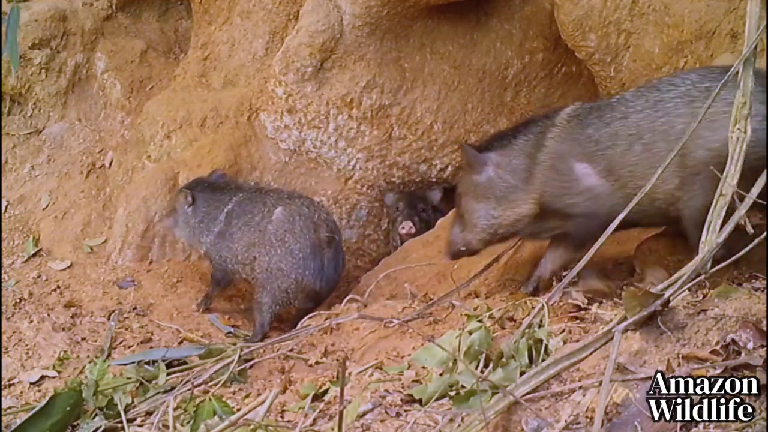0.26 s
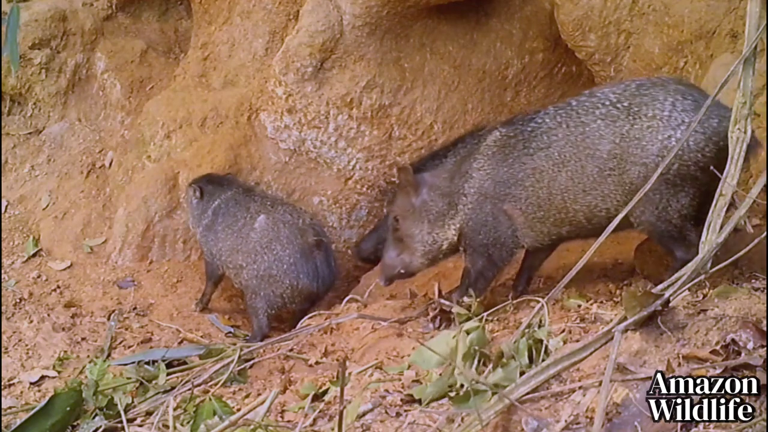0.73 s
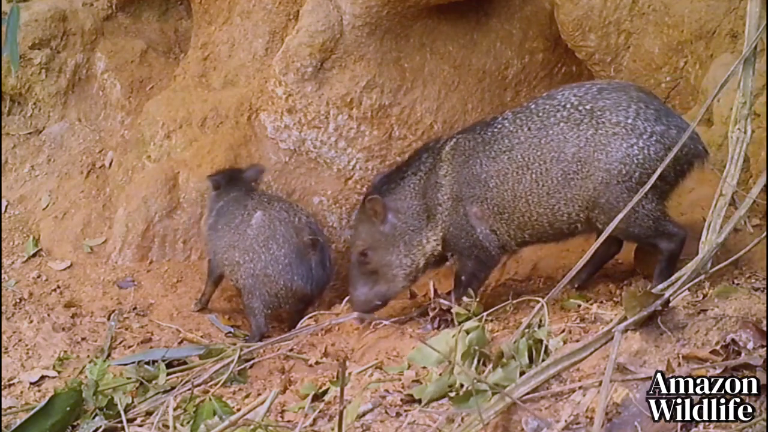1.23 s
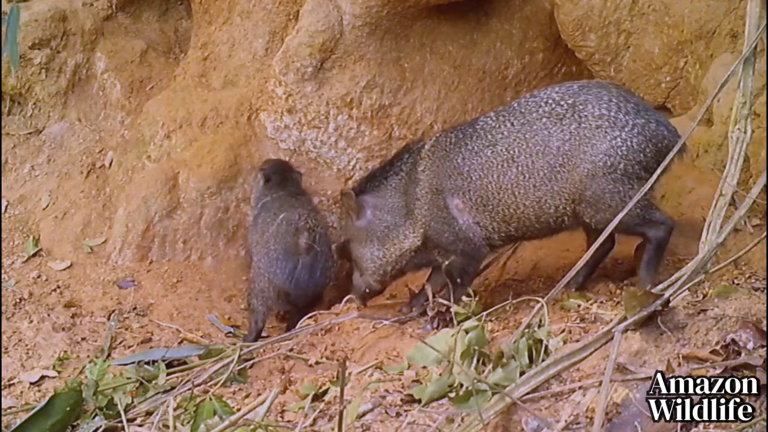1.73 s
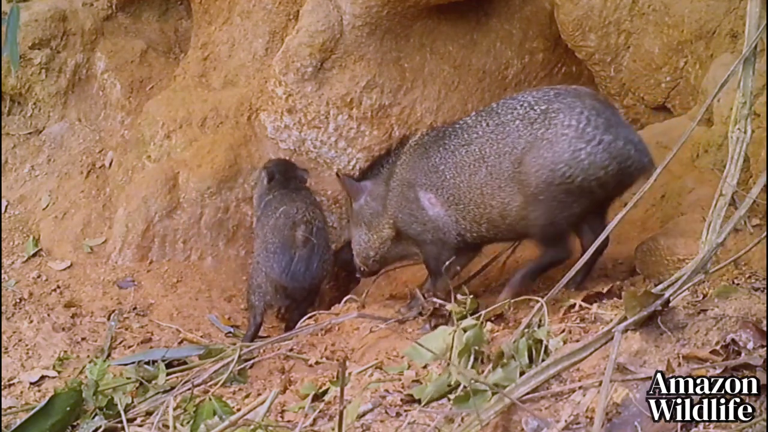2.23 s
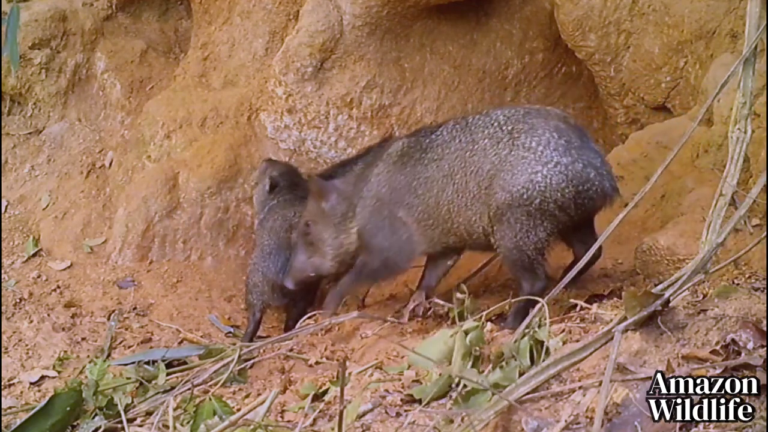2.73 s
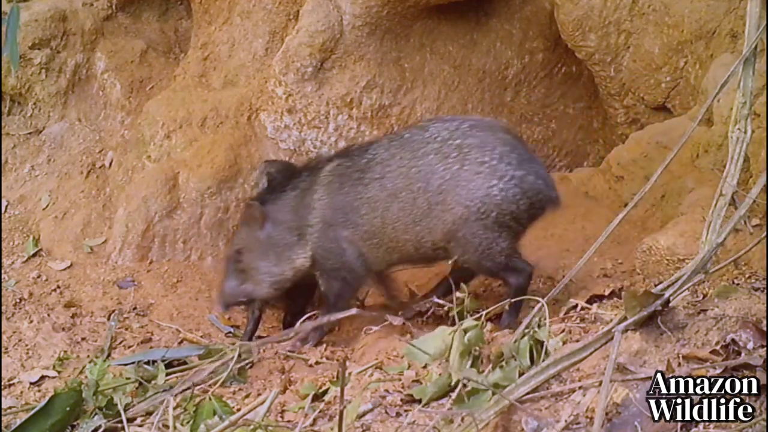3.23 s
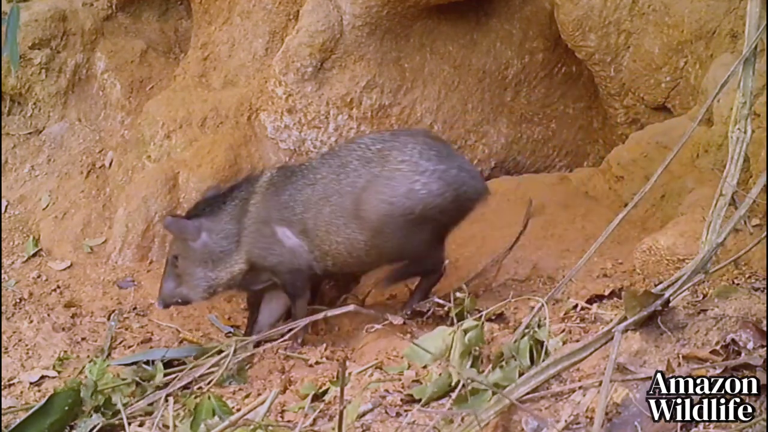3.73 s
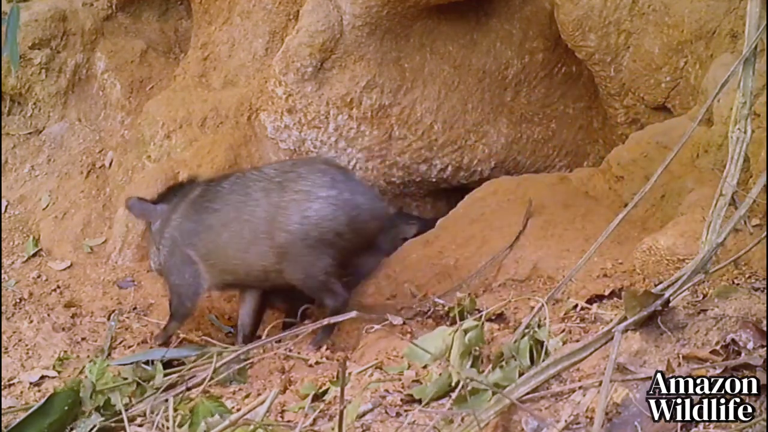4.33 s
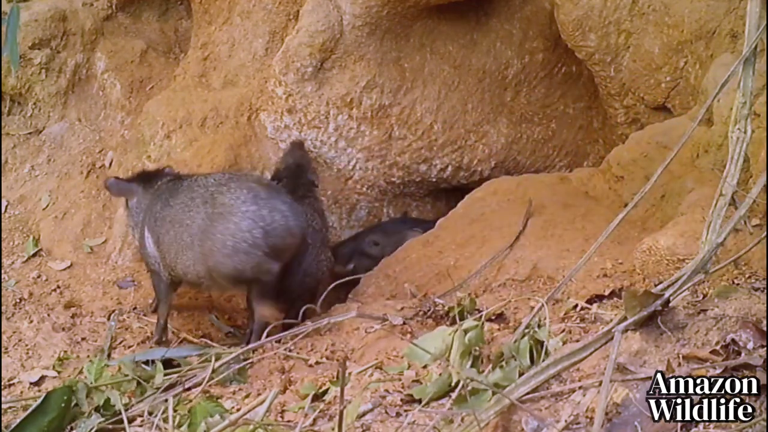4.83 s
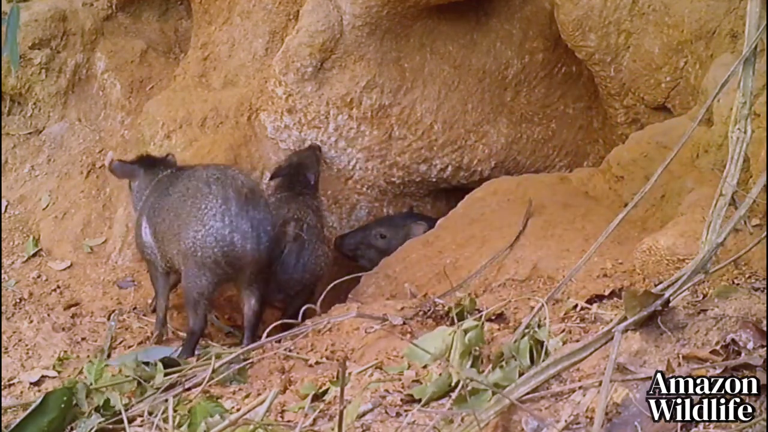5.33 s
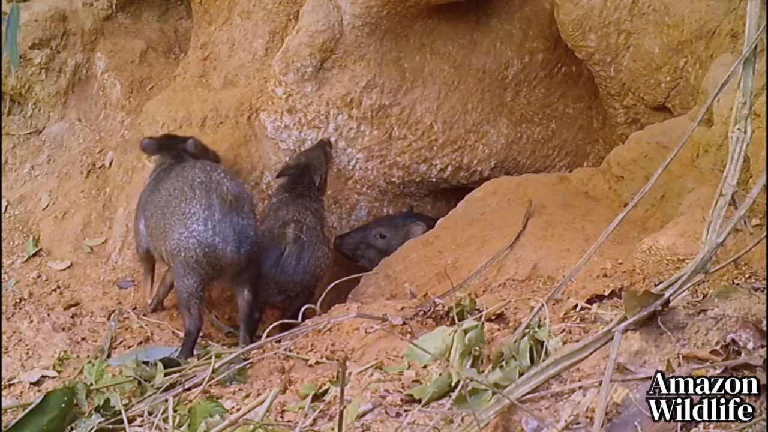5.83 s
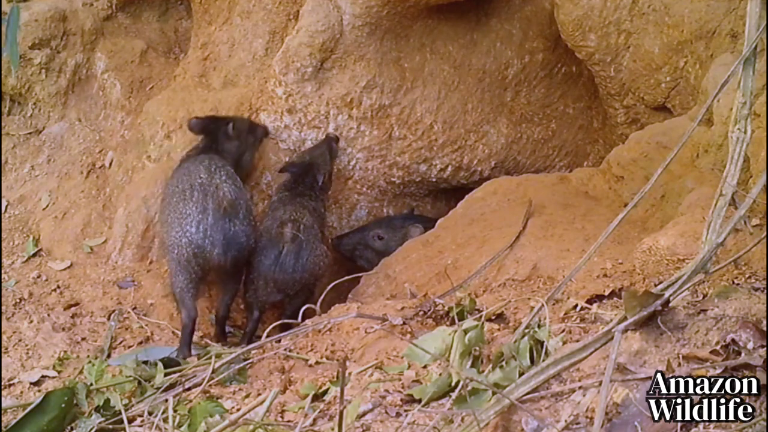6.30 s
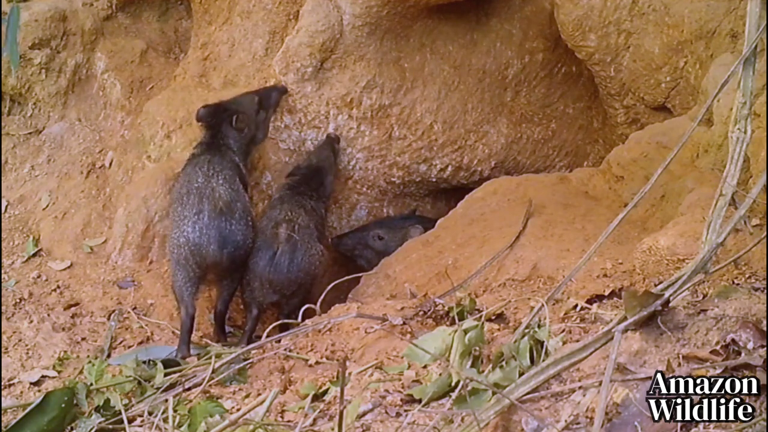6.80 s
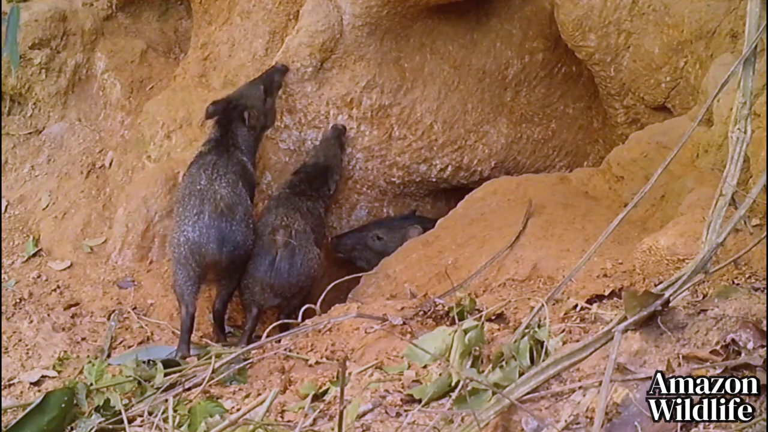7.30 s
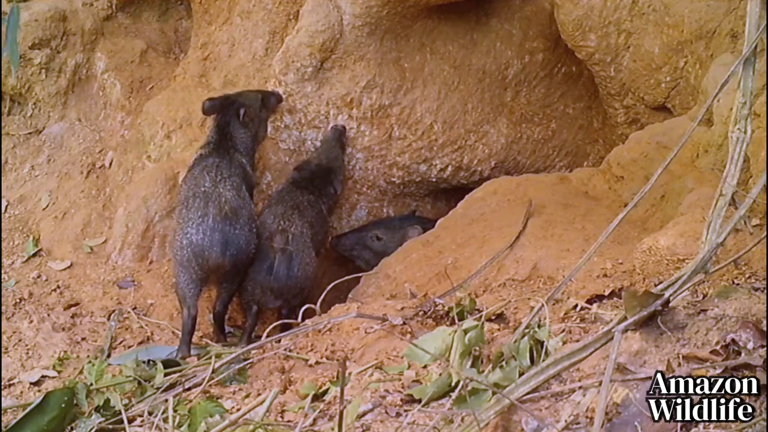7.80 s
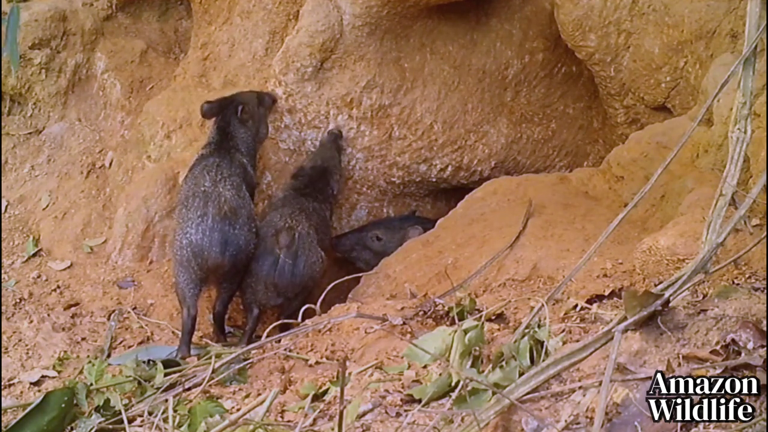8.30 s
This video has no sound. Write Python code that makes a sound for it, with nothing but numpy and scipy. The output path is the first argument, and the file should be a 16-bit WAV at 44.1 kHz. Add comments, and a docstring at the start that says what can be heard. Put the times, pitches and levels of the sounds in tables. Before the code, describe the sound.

Throughout, crickets repeat high chirps about four or five times a second, with higher katydid rasps, a distant insect chorus and a soft wash of tropical forest air. Nearby, wild pigs scuff through dry leaves and loose soil. A quick cluster of sharp twig snaps and a gritty scrape comes at 0.3 to 0.6 seconds. Lighter clicks follow, then another loud crackle and scuffing from 2.4 to 2.8. More shuffles and snaps come around 3.4, 4, 4.6 to 5.4, 6.6 to 6.9, 7.6 and 8.1, with a sharp crack at 8.5. Soft low footfalls thud near 0.6 and 2 seconds. Faint, thin whistles sound far off around 1.6, 3 and 8, and a faint hoarse drone sinks in pitch between 2.5 and 4.3. Two tiny, low grunts come at 6.1 and 7.1. Everything is fairly quiet, heard through a small microphone with softened top treble.

```python
"""Wild pigs in a tropical forest at night.

Crickets and katydids stridulate, their calls scattered by the trunks, over a far insect chorus and a
steady wash of air. Pigs scuff through loose soil and leaf litter at a clay bank, snap twigs, shake the
ground with heavy steps and grunt twice. Thin whistles and a hoarse drone come from far away.
A small trail camera hears it all through a narrow microphone band."""
import sys
import numpy as np
from scipy import signal
from scipy.fft import rfft, irfft, next_fast_len
from scipy.io import wavfile
from scipy.ndimage import uniform_filter1d, map_coordinates

SR = 44100
rng = np.random.default_rng(int(sys.argv[2]) if len(sys.argv) > 2 else 0)


def transcribe(u):
    """Save the signal u as a 16-bit wav file named by the first command-line argument.

    u: samples, shape (n,) or (channels, n), limited to [-1, 1]; the rate is SR.
    q: integer samples, one column per channel.
    """
    v = np.clip(np.atleast_2d(u).T, -1, 1)
    q = np.round(v * 32767).astype(np.int16)
    wavfile.write(sys.argv[1], SR, q)


N = 377055


def amp(db):
    """Amplitude ratio of a level in dB."""
    return 10 ** (np.asarray(db) / 20)


def unit(x):
    """Normalisation to rms 1."""
    return x / np.sqrt(np.mean(x ** 2) + 1e-20)


def along(points, hz):
    """Interpolation of (f/Hz, value) points on a logarithmic frequency axis."""
    f, v = np.transpose(points)
    return np.interp(np.log(hz + 1), np.log(f + 1), v)


def curves(rows):
    """Linear interpolation in time: one value per sample for each column after the first."""
    s, *cols = np.transpose(rows)
    return [np.interp(np.arange(N) / SR, s, c) for c in cols]


def wobble(rate):
    """Smooth random modulation: a spline through rate knots a second."""
    knots = rng.standard_normal(int(N * rate / SR) + 4)
    return map_coordinates(knots, [np.arange(N) * rate / SR])


def filtered(x, response):
    """Linear filtering: the spectrum of x times a frequency response."""
    m = next_fast_len(len(x) + 8192)
    return irfft(rfft(x, m) * response(np.fft.rfftfreq(m, 1 / SR)), m)[:len(x)]


def mode(f, centre_hz, width_hz):
    """Frequency response of a damped resonator."""
    return 1j * f * width_hz / (centre_hz ** 2 - f * f + 1j * f * width_hz)


def band(x, hz, width_hz):
    """Band-pass filtering by three equal resonators in cascade, at rms 1."""
    return unit(filtered(x, lambda f: mode(f, hz, width_hz) ** 3))


def add(track, s, sound):
    """Superposition of a sound on the track at s seconds."""
    part = track[round(s * SR):][:len(sound)]
    part += sound[:len(part)]


def among_trees(call, t60, wet_db):
    """Multiple scattering: trunks give each call its own decaying tail; its energy is kept."""
    t = np.arange(SR // 2) / SR
    path = rng.standard_normal(len(t)) * amp(-60 * t / t60)
    path = amp(wet_db) * path / np.linalg.norm(path)
    path[0] = 1  # direct sound
    heard = signal.fftconvolve(call, path)
    return heard * np.linalg.norm(call) / np.linalg.norm(heard)


def glide(start_hz, end_hz, length, rasp_hz, attack_s):
    """Frequency modulation: a gliding tone of rms 1, broadened by a random deviation of rasp_hz rms."""
    t = np.arange(round(length * SR)) / SR
    uneven = uniform_filter1d(rng.standard_normal(SR // 2), size=60)[:len(t)]
    hz = start_hz + (end_hz - start_hz) * t / length + rasp_hz * unit(uneven)
    envelope = np.minimum(1, np.minimum(t / attack_s, (length - t) / (2.6 * attack_s)))
    return unit(envelope * np.sin(2 * np.pi * np.cumsum(hz) / SR))


def stridulation(strokes, length, low_hz, high_hz, rasp_hz, t60, wet_db, gain_db):
    """File and scraper: the pitch climbs as the wing closes, and uneven teeth spread it."""
    out = np.zeros(N)
    for s, db in strokes:
        tune, stretch = 1 + np.array([0.005, .1]) * rng.standard_normal(2)
        call = glide(low_hz * tune, high_hz * tune, length * stretch, rasp_hz, attack_s=0.014)
        add(out, s, amp(db + gain_db) * among_trees(call, t60, wet_db))
    return out


def air():
    """Broadband ambient noise: a steady wash whose rumble is amplitude-modulated into soft lumps."""
    # spectrum of the wash: f/Hz, power density level/dB re 1 per Hz
    spectrum = [(12, -110), (22, -88), (35, -92), (70, -92.5), (130, -96.5), (250, -98), (500, -97.5),
                (900, -102), (2000, -103), (4600, -106), (9000, -108)]
    white = np.sqrt(SR / 2) * rng.standard_normal(N)  # unit power per Hz
    wash = filtered(white, lambda f: amp(along(spectrum, f)))
    rumble = filtered(wash, lambda f: 1 / (1 + (f / 350) ** 2))
    lumps = amp(0.5 * wobble(8.6) + 1.2 * wobble(21) - 2.0)
    return wash + (lumps - 1) * rumble


def chorus():
    """Incoherent summation: insects too far to tell apart blur into narrow, throbbing noise bands."""
    # far crickets, katydids, low trillers: f/Hz, resonator width/Hz, base level/dB
    far_bands = [(3965, 530, -60), (5450, 1200, -63.5), (2816, 450, -66)]
    # swell and fade of the low trillers: t/s, gain/dB
    swell = [(0, -1), (1.4, 2.5), (2.2, -4), (3.6, 4), (4.9, 1.5), (5.8, 1.5), (6.2, -6), (7.0, -7),
             (7.5, 0.5), (8.55, -6)]
    far_crickets, far_katydids, trillers = [
        amp(db + 1.7 * wobble(5.4)) * band(rng.standard_normal(N), hz, width_hz)
        for hz, width_hz, db in far_bands]
    return far_crickets + far_katydids + amp(curves(swell)[0]) * trillers


def scuffs():
    """Granular noise: a faint rustle is many small impacts, a hard scuff a few large ones."""
    # bands of the litter (leaves, crumbs, thud, hiss): f/Hz, resonator width/Hz, gain/dB
    litter = [(3030, 2540, 0.5), (1823, 660, -1), (943, 1200, -2.5), (6460, 9500, 5.5)]
    # unceasing rustle in the same four bands: relative level/dB
    rustle_db = [-60.5, -65, -67, -68]
    # drags of hooves and snouts: peak t/s, relative leaf level/dB, rise/s, fall/s, crumb offset/dB
    drags = [(0.02, -61.5, .05, 0.12, -15), (0.28, -61, 0.029, 0.065, -18), (0.47, -42.5, 0.11, 0.12, -10),
             (0.535, -43, .07, 0.056, -6), (0.93, -55.5, .04, 0.036, -0.5), (1.07, -57, 0.074, 0.22, -8),
             (1.45, -54.5, 0.024, 0.046, -13), (1.64, -56, 0.12, 0.33, -10), (1.92, -62.5, 0.07, 0.027, 0),
             (2.43, -51, 0.072, .07, -4.5), (2.64, -49, 0.15, .08, -9), (2.76, -54, 0.095, 0.23, -6.5),
             (3.39, -50.5, .03, 0.13, -6), (3.46, -49, 0.092, 0.098, -7), (4.05, -49, 0.17, 0.12, -8),
             (4.6, -51, 0.027, 0.13, -6), (4.69, -50.5, .04, 0.079, -7), (4.83, -50, 0.041, 0.051, 0.5),
             (5.27, -56, 0.036, 0.045, -2), (5.334, -47.5, 0.033, 0.049, -3), (5.5, -58, 0.065, 0.018, -4),
             (6.62, -53.5, 0.089, 0.049, -6), (6.79, -51, 0.12, 0.064, -8), (7.36, -59.5, 0.14, .08, -8),
             (7.6, -49.5, .02, 0.1, -6.5), (7.86, -60, 0.034, 0.041, -7), (8.0, -55, 0.033, .04, -6),
             (8.071, -53, 0.01, .06, -1), (8.4, -59, 0.086, .1, -4), (8.55, -52, .03, .03, -12)]
    edge_db, rounding = 11.5, 1.3  # drop over one rise or fall time; exponent that rounds the top
    thud_db = -14
    t = np.arange(N) / SR
    power = amp(rustle_db)[:, None] ** 2 * np.ones(N)
    for s, db, rise, fall, crumbs_db in drags:
        from_peak = np.maximum((s - t) / rise, (t - s) / fall)
        drag = amp(db - edge_db * from_peak ** rounding)
        hiss_db = -15 + 0.7 * (db + 48.5)  # louder scuffs are brighter
        power += (amp([[0], [crumbs_db], [thud_db], [hiss_db]]) * drag) ** 2
    leaves_db = 10 * np.log10(power[0])
    coarseness = np.clip((leaves_db + 66) / 14, .15, 1)
    clumps = unit(amp(2.2 * wobble(300) + 1.4 * wobble(40)))
    noise = rng.standard_normal(N)
    grains = 3 * [noise * clumps ** coarseness] + [noise * clumps ** 0.69]  # the hiss is always gritty
    bands = [amp(db) * band(x, hz, width_hz) for x, (hz, width_hz, db) in zip(grains, litter)]
    return np.sum(np.sqrt(power) * bands, axis=0)


def katydids():
    """Stridulation with a very uneven tooth rate gives rising rasps."""
    # wing strokes: t/s, relative level/dB
    strokes = [(0.044, -62), (0.575, -63), (0.855, -79), (1.017, -66.5), (1.249, -61), (1.57, -65.5),
               (1.838, -69.5), (2.12, -68.5), (2.364, -60), (2.601, -62.5), (2.751, -60.5), (3.117, -60),
               (3.307, -64), (3.472, -60.5), (3.736, -59), (4.033, -59.5), (4.345, -61), (4.756, -61.5),
               (5.138, -59), (5.4, -67), (5.574, -59.5), (5.68, -65), (5.844, -68), (6.058, -63.5),
               (6.37, -67), (6.704, -62.5), (7.118, -64.5), (7.298, -63.5), (7.532, -63.5), (7.727, -63),
               (7.974, -61.5), (8.301, -62), (8.483, -61)]
    return stridulation(strokes, length=0.11, low_hz=5180, high_hz=5900, rasp_hz=226.5,
                        t60=0.77, wet_db=2.5, gain_db=5.0)


def crickets():
    """Stridulation with a nearly even tooth rate gives rising, tonal chirps."""
    # wing strokes: t/s, relative level/dB
    strokes = [(0.095, -53), (0.212, -51), (0.397, -49.5), (0.52, -51.5), (0.636, -51.5), (0.9, -61.5),
               (1.01, -49), (1.369, -50), (1.709, -50), (2.028, -53), (2.215, -52.5), (2.37, -49.5),
               (2.617, -52.5), (2.776, -51), (3.031, -52), (3.125, -53), (3.442, -49.5), (3.771, -52.5),
               (3.855, -53), (4.035, -65), (4.188, -53), (4.26, -52), (4.53, -52), (4.677, -53),
               (4.879, -52), (5.083, -53), (5.273, -51), (5.475, -55), (5.672, -51.5), (5.882, -54.5),
               (6.059, -50.5), (6.283, -54), (6.375, -53.5), (6.47, -59), (6.707, -50), (7.106, -50.5),
               (7.36, -64), (7.525, -50), (7.867, -50), (8.294, -51), (8.506, -58)]
    return stridulation(strokes, length=0.074, low_hz=3830, high_hz=4250, rasp_hz=59,
                        t60=0.61, wet_db=6.0, gain_db=1.5)


def snaps():
    """Brittle fracture: an impulse and a splintering burst excite two damped rings, a tick and a knock."""
    # breaking twigs and clods: t/s, relative peak level/dB, low ring f/Hz, relative treble gain/dB
    fractures = [(0.281, -38, 2040, 5), (0.368, -33.5, 2090, 4), (0.396, -36, 1610, -21),
                 (0.413, -28, 2060, 5), (0.454, -25.5, 2100, 5), (0.487, -26, 2300, 6),
                 (0.546, -25, 2100, 3), (0.886, -44, 1750, -17), (0.909, -32.5, 2190, -4),
                 (1.44, -37, 2330, 8), (1.883, -43, 1440, -12), (1.908, -34, 1950, 9),
                 (2.099, -41, 1990, -7), (2.378, -33.5, 1930, 1), (2.406, -32.5, 2350, 11),
                 (2.417, -25.5, 2320, 10), (2.563, -37, 1830, 3), (2.628, -34, 2000, 8),
                 (2.818, -40.5, 1450, -10), (3.318, -33, 2100, 1), (3.381, -30, 2050, -9),
                 (3.564, -38, 1700, -9), (3.781, -45, 1600, -11), (3.785, -43, 780, -15),
                 (3.939, -40, 2180, -8), (4.21, -46.5, 780, -16), (4.312, -40, 1480, -9),
                 (4.35, -44, 1180, -12), (4.596, -44, 2200, -2), (4.679, -32, 1390, 1),
                 (4.708, -36, 1980, -13), (4.819, -31.5, 1960, -19), (4.823, -33, 2030, -14),
                 (4.829, -34, 1300, -8), (4.853, -40, 1200, -19), (4.86, -38.5, 855, -9),
                 (5.114, -44, 2020, 0), (5.251, -43, 2080, -16), (5.269, -40.5, 2090, -15),
                 (5.327, -31.5, 1950, -15), (5.333, -36.5, 815, -12), (5.482, -32, 2200, -18),
                 (5.875, -41, 2060, -11), (6.235, -36, 1980, -13), (6.599, -38, 1860, -13),
                 (6.772, -39, 2100, -8), (6.903, -34.5, 1910, -6), (6.988, -45.5, 1970, -18),
                 (7.085, -43, 2000, -17), (7.595, -36, 1660, 9), (8.068, -29.5, 1840, -15),
                 (8.072, -32, 910, -8), (8.078, -33.5, 1640, -12), (8.48, -43, 2380, -2),
                 (8.522, -27, 1790, -3.5)]
    splinter_t60_s = 0.083
    out, t = np.zeros(N), np.arange(SR // 8) / SR
    for s, db, low_hz, high_db in fractures:
        high_hz = 2990 * (1 + 0.054 * rng.standard_normal())
        burst = rng.standard_normal(len(t)) * amp(-60 * t / splinter_t60_s)
        burst[0] = 10  # the break itself
        rings = filtered(burst, lambda f: mode(f, low_hz, 0.33 * low_hz) ** 2
                         + amp(high_db + 3.0) * mode(f, high_hz, 650) ** 2
                         + amp(high_db - 12.5) * mode(f, 4400, 4000)  # bright tick
                         + amp(-15.5) * mode(f, 1200, 1400))  # dull knock
        add(out, s, amp(db - 1.5) * rings / np.abs(rings).max())
    return out


def bumps():
    """Damped oscillation: a heavy step shakes the ground under the camera."""
    # steps: t/s, level of the decay at onset/dB, f/Hz, t60/s
    steps = [(.58, -64, 65, 0.23), (2.02, -58, 56.5, 0.22)]
    out, t = np.zeros(N), np.arange(SR // 2) / SR
    attack = 1 - np.exp(-t / 0.0099)
    for s, db, hz, t60 in steps:
        add(out, s, amp(db - 60 * t / t60) * attack * np.sin(2 * np.pi * hz * t))
    return out


def whistles():
    """Reverberation: soft gliding tones from deep in the forest arrive mostly as scattered sound."""
    # thin far whistles: t/s, level before scattering/dB, start f/Hz, end f/Hz, duration/s
    calls = [(1.588, -64, 3520, 3360, 0.15), (3.047, -65, 2390, 2170, 0.16), (8.032, -70, 2300, 2320, 0.48),
             (8.1, -63, 3560, 3540, 0.086)]
    out = np.zeros(N)
    for s, db, start_hz, end_hz, length in calls:
        tone = glide(start_hz, end_hz, length, rasp_hz=23, attack_s=0.024)
        add(out, s, amp(db) * among_trees(tone, t60=0.55, wet_db=9))
    return out


def drone():
    """Random amplitude modulation spreads a sinking tone into a hoarse band that swells and fades."""
    # course of the far drone: t/s, centre f/Hz, relative level/dB
    course = [(2.5, 935, -79), (2.58, 925, -58), (3.4, 929, -58), (3.6, 804, -62.5), (4.3, 781, -68)]
    hz, db = curves(course)
    t = np.arange(N) / SR
    sounding = (t > course[0][0]) & (t < course[-1][0])
    rough = wobble(260) * np.sin(2 * np.pi * np.cumsum(hz) / SR)
    return sounding * amp(db - 9.0) * unit(rough)


def grunts():
    """Source and filter: a few glottal pulses excite the formants of a pig's throat."""
    # grunts: t/s, relative level/dB, pulse f/Hz, duration/s
    calls = [(6.065, -57, 113, 0.0275), (7.112, -55, 121.8, 0.035)]
    # throat resonances: f/Hz, width/Hz, gain/dB
    formants = [(135, 24, 3.5), (440, 154, 2), (673, 48, 5.5)]
    pulses = np.zeros(N)
    for s, db, hz, length in calls:
        t = np.arange(0, length, 1 / hz)
        arch = np.sin(np.pi * (t + .5 / hz) / length)
        pulses[np.round((s + t) * SR).astype(int)] = amp(db + 43.0) * arch

    def throat(f):
        """Parallel resonators of alternating sign, low-passed at 800 Hz."""
        modes = sum((-1) ** k * amp(db) * mode(f, hz, width) for k, (hz, width, db) in enumerate(formants))
        return modes / (1 + (f / 800) ** 4)
    return filtered(pulses, throat)


def scene():
    """Superposition of all sources at one microphone."""
    insects = crickets() + katydids()
    pigs = scuffs() + snaps() + grunts() + bumps()
    return (insects + pigs + chorus() + whistles() + drone() + air())[None]


def record(dry):
    """Band limiting: the microphone rolls off steeply in the treble; faint converter hiss extends above."""
    # microphone response: f/Hz, gain/dB
    response = [(6500, 1), (7500, -4), (8200, -13), (8800, -27), (9300, -36.5), (9800, -39.5)]
    cutoff_hz = 15500
    narrow = filtered(dry[0], lambda f: amp(along(response, f)))
    hiss = amp(-84.5) * rng.standard_normal(N)
    return filtered(narrow + hiss, lambda f: f < cutoff_hz)[None]


dry = scene()
out = record(dry)
transcribe(out)
```